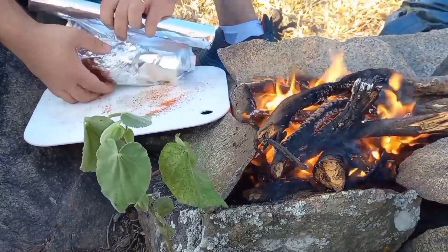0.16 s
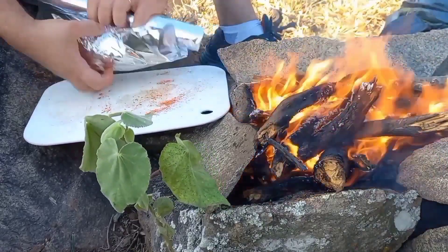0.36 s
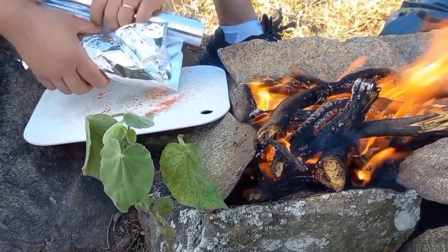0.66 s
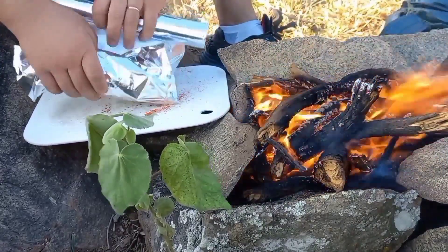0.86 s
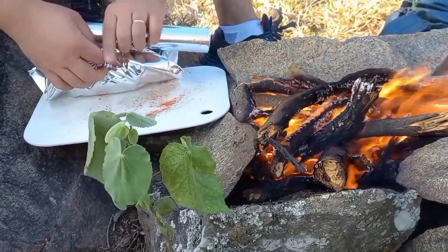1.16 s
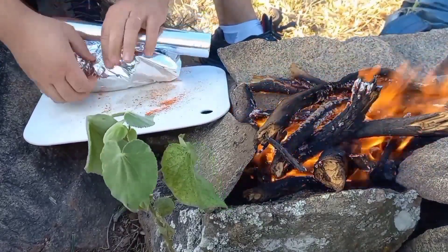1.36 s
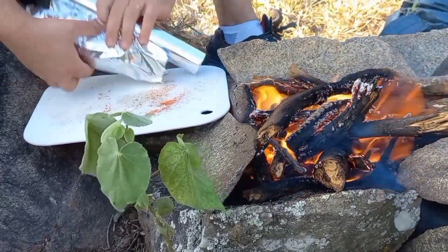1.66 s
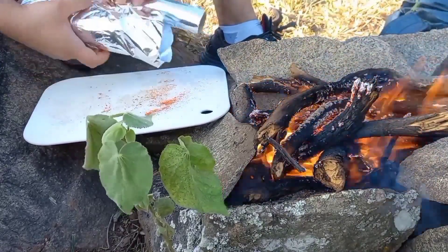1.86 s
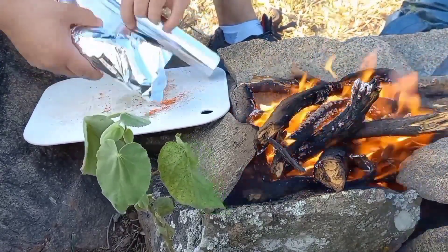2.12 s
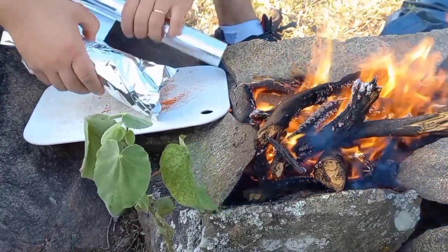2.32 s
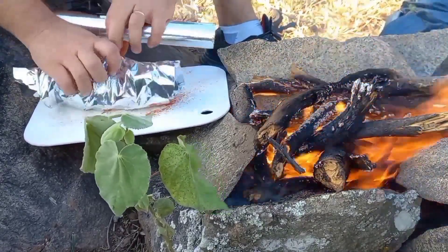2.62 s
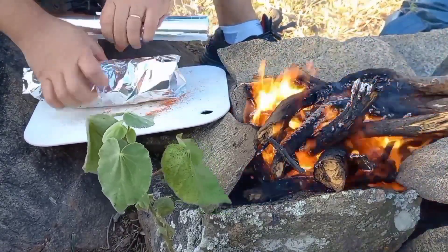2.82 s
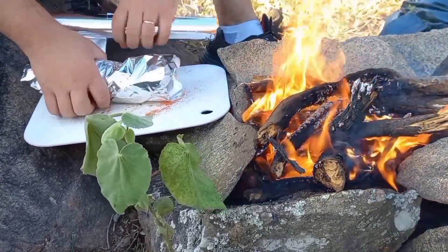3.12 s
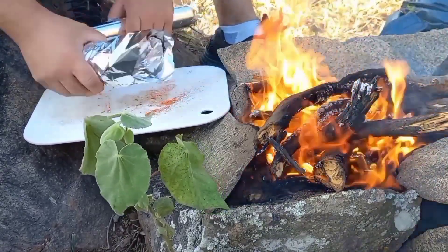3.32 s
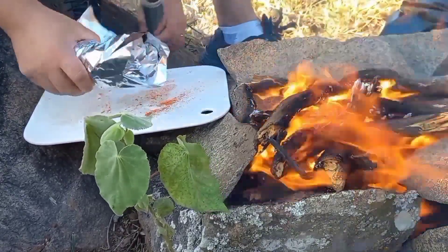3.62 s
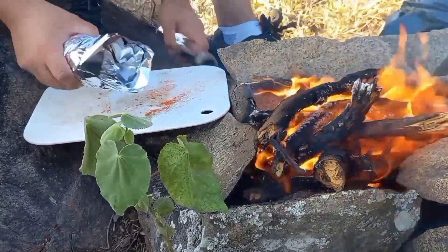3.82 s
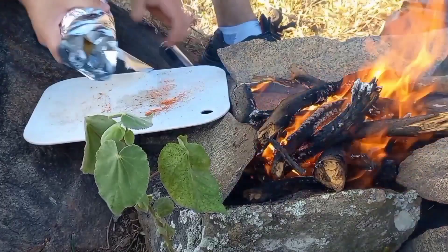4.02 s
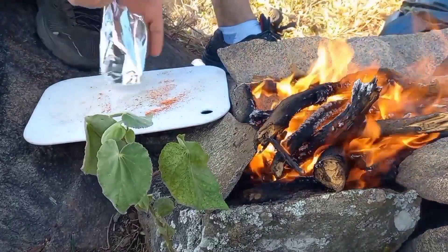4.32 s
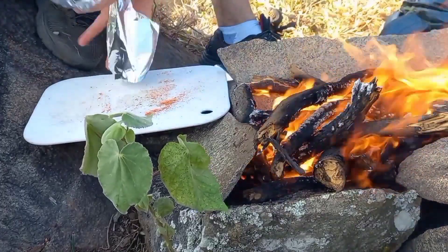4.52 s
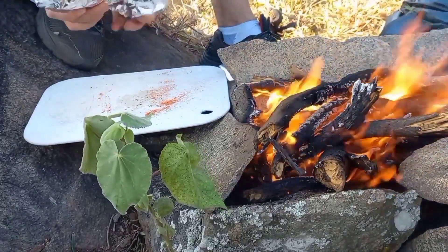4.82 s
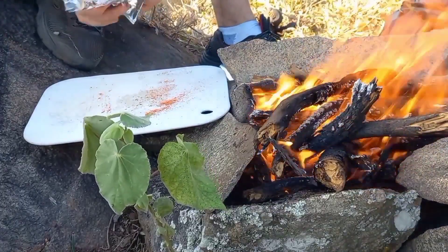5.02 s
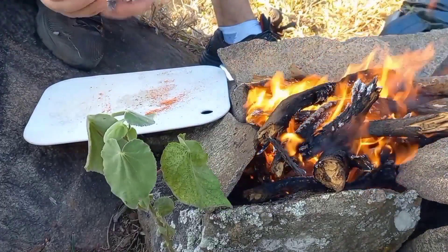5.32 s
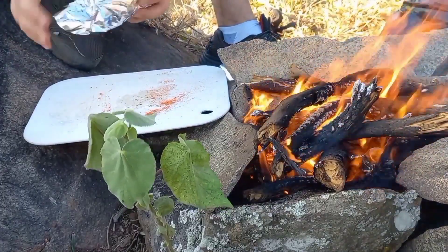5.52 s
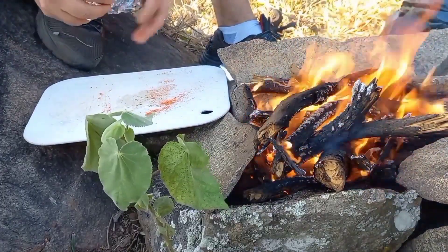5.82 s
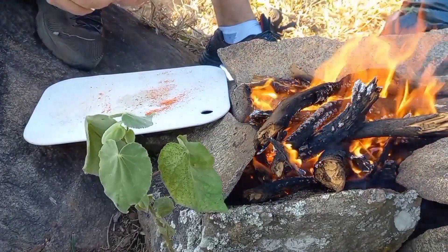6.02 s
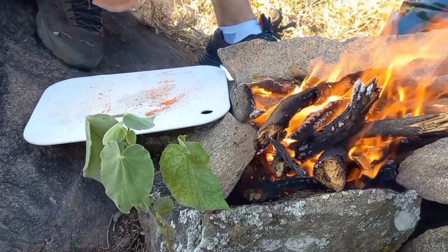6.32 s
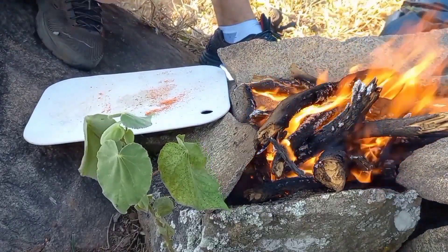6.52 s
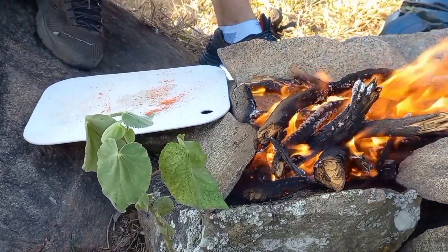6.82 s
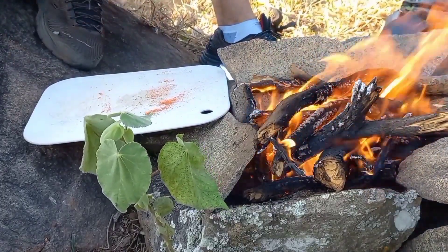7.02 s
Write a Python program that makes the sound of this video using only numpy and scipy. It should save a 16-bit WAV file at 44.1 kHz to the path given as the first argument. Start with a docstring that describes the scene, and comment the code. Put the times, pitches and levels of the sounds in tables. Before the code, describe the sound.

Hands crinkle and squeeze aluminium foil close by, crackling brightly with sharp fold snaps, while low wind buffets the microphone outdoors over a faint fire.

```python
"""Beside a camp fire: hands wrap aluminium foil round food, to the left of two close microphone ports.
Tiny creases crackle and fizz in clumps, wide panels flex lower down: random clicks set off pitched noise.
The fingers squeeze and pause; single folds snap as short noise bursts with a click and a knock.
Wind is low filtered noise that buffets either port, with pitched puffs as brief swelling sines.
Behind it lies the faint, steady filtered noise of the fire."""
import sys
import numpy as np
from scipy import signal
from scipy.fft import rfft, irfft
from scipy.io import wavfile
from scipy.ndimage import uniform_filter1d

SR = 44100
rng = np.random.default_rng(int(sys.argv[2]) if len(sys.argv) > 2 else 0)


def master_out(mix):
    """Clip the mix to full scale and print it as 16-bit PCM to the path in sys.argv[1]."""
    frames = np.transpose(np.atleast_2d(mix))
    ceiling = np.clip(frames, -1, 1)
    pcm = np.round(ceiling * 32767).astype(np.int16)
    wavfile.write(sys.argv[1], SR, pcm)


N = 315691

# spectrum of small creases: f/Hz, relative level/dB
CREASE_COLOUR = [(1500, -4), (2600, -11), (3800, 1), (5300, 5.5), (7400, 4), (8600, -33), (11000, 4)]
# spectrum of wide flexing panels: f/Hz, relative level/dB
PANEL_COLOUR = [(250, -24.5), (480, -2.5), (700, -9.5), (1000, -3), (1400, 2), (2100, 2), (3100, 3.5),
                (5000, 11)]
# spectrum of the finest creases, the fizz: f/Hz, relative level/dB
FINE_COLOUR = [(5000, -16), (7500, -2), (8700, -3), (11000, 0.5), (13500, 5), (16000, -1.5)]


def foil():
    """Creases crackle, the finest of them fizz and wide panels flex low, all under the same hands."""
    # the hands between squeezes: t/s, creasing level/dB, panel level/dB re creasing,
    # extra level of the deepest panels/dB
    hands = [(0.0, -39, -5, 2), (0.08, -37.5, -2, -1.5), (1.2, -39.5, 1, 1), (2.1, -41.5, 0, 5.5),
             (2.18, -43, -4.5, 5), (2.32, -44, -12, 5), (2.4, -38, -2, -4), (2.8, -43.5, 3.5, 0.5),
             (2.88, -47.5, -2.5, -11), (3.05, -41, -4.5, -6.5), (3.4, -41.5, -0.5, -13.5),
             (3.54, -38, -5.5, -12), (3.6, -50, -28, 17), (4.1, -46.5, -8, -5), (4.62, -47.5, -14, 0),
             (4.75, -40.5, -3, -4.5), (5.3, -37, -2.5, -3.5), (5.5, -43, -7.5, 0.5), (5.85, -43, -4.5, -4),
             (6.1, -50.5, -16.5, 1), (6.75, -50, -9, -9), (7.16, -49.5, -23, -3)]
    # squeezes of the fingers: start t/s, hold/s, creasing level/dB, panel level/dB and fizz level/dB re creasing
    squeezes = [(0.038, 0.12, -42, 2.5, -5), (0.103, 0.077, -39, 5.5, -9), (0.29, 0.064, -35, 1, 2.5),
                (0.508, 0.012, -29.5, 1.5, 6.5), (0.854, 0.14, -38.5, -0.5, 7),
                (0.856, 0.033, -35, -3.5, -6), (1.062, 0.06, -36, 3.5, 4.5), (1.272, 0.026, -40, 3, -2),
                (1.408, 0.016, -39, 1, 4), (1.476, 0.068, -40, -5, -1), (1.539, 0.16, -46, 9.5, 9),
                (1.753, 0.097, -37, -4, 3), (1.92, 0.022, -37, 2, 8), (1.991, 0.049, -39, 0.5, 3),
                (2.074, 0.032, -38, 6.5, 12), (2.12, 0.016, -36.5, 1.5, 8.5),
                (2.208, 0.025, -42.5, -8.5, 7), (2.348, 0.031, -39.5, -7, 9),
                (2.432, 0.16, -36.5, -22, 1.5), (2.5, 0.085, -40.5, 3.5, 5), (2.66, 0.11, -38.5, -25, 2),
                (2.778, 0.048, -40.5, 0, -3), (2.933, 0.024, -43.5, -18, -11),
                (3.06, 0.036, -38, -0.5, 1.5), (3.156, 0.04, -40, -1, -12), (3.224, 0.04, -39, -21, -1),
                (3.339, 0.084, -32.5, -2, -2), (3.428, 0.051, -37.5, -2, -8),
                (4.198, 0.051, -40.5, -2.5, 5.5), (4.378, 0.0074, -50, 1.5, 19),
                (4.412, 0.053, -46, -4.5, 10), (4.515, 0.015, -51.5, 4, 19), (4.657, 0.018, -39, -11, 11),
                (4.712, 0.013, -44.5, 0, 13), (4.952, 0.049, -40, -6, -10), (5.252, 0.047, -35.5, -3, 2),
                (5.614, 0.031, -33.5, -3, -0.5), (5.668, 0.063, -40.5, -17, 4),
                (5.748, 0.053, -40.5, -28, -2), (5.948, 0.09, -45.5, -7.5, 4), (6.152, 0.022, -44.5, -7, 3),
                (6.188, 0.0089, -39, -7, 5), (6.276, 0.024, -44, -7, 5), (6.326, 0.03, -42.5, -7, 0),
                (6.608, 0.019, -42.5, -15, 0), (6.803, 0.0042, -33.5, -1, 0),
                (6.963, 0.0066, -41.5, -17, 5.5)]
    touch_db, flex_db, deep_db = columns(hands)
    top_db, top_flex_db, top_fizz_db = np.transpose(squeezes)[2:]

    def squeezed(base_db, tops_db):
        return gain_of(topped(base_db, squeezes, tops_db, rise_db_per_s=1087, fall_db_per_s=595))

    # the fizz comes and goes on its own
    fizz_db = 4.5 + 2.5 * drift(12, channels=1)[0]
    crease_gain = squeezed(touch_db, top_db)
    panel_gain = squeezed(touch_db + flex_db, top_db + top_flex_db)
    fizz_gain = squeezed(touch_db + fizz_db, top_db + top_fizz_db)

    creases = buckles(2200, 9000, per_s=3200, spread_db=3.0, t60=0.045, clump_db=1.5, clump_hz=24, share=0.25)
    fizz = buckles(7500, 16000, per_s=3000, spread_db=2.8, t60=0.055, clump_db=4.6, clump_hz=22, share=0.25)
    panels = buckles(361, 3300, per_s=1500, spread_db=1.8, t60=0.055, clump_db=1.2, clump_hz=12.4, share=0.78)
    creases = steadied(coloured(creases, CREASE_COLOUR), 0.1)
    fizz = steadied(coloured(fizz, FINE_COLOUR), 0.07)
    panels = steadied(coloured(panels, PANEL_COLOUR), 0.082)

    # the deepest panels lie below about 1150 Hz
    deep = signal.sosfiltfilt(signal.butter(2, 1150, fs=SR, output="sos"), panels)
    panels = panels + (gain_of(deep_db) - 1) * deep

    # folds run into each other and shake the whole sheet
    crumple = gain_of(0.2 * drift(46.2, channels=1))
    rustle = crease_gain * creases + fizz_gain * fizz + panel_gain * panels
    return pauses() * crumple * rustle


def buckles(low_hz, high_hz, per_s, spread_db, t60, clump_db, clump_hz, share, count=20):
    """Random buckling clicks, mostly small and in clumps; each patch of the sheet rattles round its own pitch."""
    clicks = rng.random(N) < per_s / SR
    size = clicks * gain_of(spread_db * np.minimum(rng.exponential(1, N), 5))
    patch = rng.integers(0, count, N)
    shiver = rng.standard_normal((3, N))
    out = np.zeros((3, N))  # straight sound, then scattered sound left and right
    clumps = gain_of(clump_db * drift(clump_hz, channels=count // 4))  # neighbouring pitches clump together
    decay_power = burst(t60, np.ones(3000)) ** 2
    for k, hz in enumerate(np.geomspace(low_hz, high_hz, count)):
        click_power = (size * clumps[k // 4] * (patch == k)) ** 2
        power = signal.oaconvolve(click_power, decay_power)[:N]
        rattle = np.sqrt(abs(power) / hz) * np.roll(shiver, rng.integers(N), 1)
        out += signal.lfilter(*signal.iirpeak(hz, 5, SR), rattle)
    return at_ports(out[0], out[1:], share)


def pauses():
    """The hands stop for a moment: the rustle sinks, stays low and springs back."""
    # pauses of the hands: start t/s, hold/s, level change/dB
    stops = [(3.595, 0.0064, -12), (3.717, 0.068, -9.5), (3.984, 0.0055, -5), (5.571, 0.012, -16.5),
             (5.897, 0.023, -21), (6.211, 0.023, -11), (6.659, 0.055, -12), (7.073, 0.043, -8.5)]
    sink_s, spring_s = 0.046, 0.019
    t = np.arange(N) / SR
    total_db = np.zeros(N)
    for s, hold, db in stops:
        total_db += np.interp(t, [s - sink_s, s, s + hold, s + hold + spring_s], [0, db, db, 0])
    return gain_of(total_db)


def snaps():
    """Each fold cracks and rattles out; the parcel under it takes a short uneven knock."""
    # single folds snapping: t/s, drive level/dB, then panel body, thud and fizz level/dB re drive;
    # body and thud are trimmed below
    folds = [(0.405, -20, 31, -32, -2), (0.5121, -31, 8, 3.5, -7), (0.86, -18.5, 11, -12, 11),
             (1.0668, -21, 35, -11, 13), (1.4119, -27, 22, -15, 1), (1.917, -18.5, 34.5, -19, 6),
             (2.0747, -18.5, 15, -31, 10), (2.102, -29, 12, -6, 0), (2.1273, -14.5, 21, -18, 2),
             (2.9272, -22.5, -7, -17.5, -6), (3.3725, -16.5, 25, -40, 0), (3.603, -34, -5, -31, 9),
             (3.6682, -24.5, 21, -16.5, -9), (3.699, -25, -14, -33, -14), (3.816, -29, 8, -25, 14),
             (4.002, -23, 18, -12, -8), (4.161, -30.5, -5, -40, 16), (4.2067, -21, -18, -32, 17),
             (4.3752, -27, 20, -25, 13), (4.4164, -23.5, -14, -43, 17), (4.4553, -22, -10, -43, -6),
             (4.5142, -25, 10, -18, 17), (4.6113, -28, -7, -30, 15), (4.6584, -21, -8, -19, 4),
             (4.718, -20, 19, -28, -4), (5.516, -17.5, -6, -28, -2), (5.602, -17, 10, -23, -3),
             (5.935, -29.5, -12, -14.5, 15.5), (6.19, -24.5, -13, -31, 13.5), (6.666, -31, -15, -32, 6),
             (6.7992, -23, 7, -9, 7), (7.142, -36.5, -10, -25, 22)]
    # spectrum of the knock on the parcel: f/Hz, relative level/dB
    thud_colour = [(120, -29), (250, 2.5), (450, -7.5), (850, -10), (1200, -32), (1700, -45), (2600, -37)]
    t60, length = 0.015, 4000
    crease, panel, fine, thud = layers = np.zeros((4, 3, N + length))
    for s, db, body_db, thud_db, fizz_db in folds:
        draws = rng.standard_normal((3, length))
        at = round(s * SR)
        span = slice(at, at + length)
        rattle = burst(t60, draws, rise_s=0.0007)
        crease[:, span] += gain_of(db - 6.5) * rattle
        panel[:, span] += gain_of(db + body_db - 29.5) * rattle
        fine[:, span] += gain_of(db + fizz_db) * burst(t60, draws, rise_s=0.008)
        # the first click of the fold
        crease[:, at + 20] += gain_of(db + 2)
        fine[:, at + 20] += gain_of(db + 2)
        # five knocks of random sign, 40 samples apart
        thud[:, at + 40:at + 240:40] += gain_of(db + thud_db + 13) * np.sign(draws[:, :5])
    colours = (CREASE_COLOUR, PANEL_COLOUR, FINE_COLOUR, thud_colour)
    fold = sum(coloured(x, colour) for x, colour in zip(layers, colours))
    return at_ports(fold[0], fold[1:], share=0.97)


def burst(t60, draws, rise_s=0.0037):
    """Rattle of a buckled patch: noise swells with time constant rise_s and dies by 60 dB in t60 seconds."""
    t = np.arange(draws.shape[-1]) / SR
    return draws * (1 - np.exp(-t / rise_s)) * gain_of(-60 * t / t60)


def at_ports(near, scattered, share):
    """Straight sound lags at the right port below 8.3 kHz; scattered sound differs; share is straight power."""
    lag_s = 0.00012
    hz = np.fft.rfftfreq(N, 1 / SR)
    # the lag grows to one full turn near 8.3 kHz; above that both ports are set in phase
    turns = np.minimum(hz * lag_s, 1)
    right = irfft(rfft(near) * np.exp(-2j * np.pi * turns), N)
    return np.sqrt(share) * np.array([near, right]) + np.sqrt(1 - share) * scattered


def wind():
    """A rumble with a faster flutter on top; the breeze and each buffet lean to one port or the other."""
    # the air between buffets: t/s, rumble level/dB, flutter level/dB, left minus right/dB
    breeze = [(0.0, -33.5, -46.5, -2), (0.2, -40, -51, -9), (0.45, -26.5, -37, 2.5), (0.62, -37, -43, -16),
              (0.75, -34.5, -45.5, 1.5), (1.15, -35, -45, -5), (1.4, -41, -36.5, -23),
              (1.57, -23.5, -56, 5), (1.72, -32.5, -38.5, -37), (1.95, -36, -38, 18), (2.3, -36, -50, -4),
              (2.75, -38, -40.5, 0), (3.05, -42.5, -52, -8), (3.3, -44, -73, -28), (3.72, -39, -60, 4),
              (3.9, -44.5, -67, -56), (4.2, -42, -66, 27), (4.6, -33, -48.5, -22), (5.0, -38, -54, -7),
              (5.5, -34, -44.5, -3), (5.58, -43, -63, -19), (5.72, -26, -37, -2), (5.9, -43.5, -60, -15),
              (6.1, -45.5, -69, 12), (6.4, -40, -49, -36), (6.72, -49.5, -64, -10), (6.8, -27, -32.5, -40),
              (7.16, -24.5, -41, 12)]
    # buffets of a gust: start t/s, hold/s, rumble level/dB, flutter level/dB re rumble, left minus right/dB
    buffets = [(0.315, 0.012, -25.5, -12, -18), (0.394, 0.014, -22.5, -18, -17),
               (0.514, 0.07, -22, -9.5, -14), (0.94, 0.022, -32, -19, -9), (1.088, 0.13, -30, -1, -0.5),
               (1.16, 0.045, -34, -5, -2), (1.248, 0.018, -20.5, -15, -14), (1.346, 0.069, -29.5, -21, -22),
               (1.527, 0.094, -24.5, -9, -2), (1.775, 0.061, -31, -24, -25), (1.885, 0.043, -22.5, -5, -5),
               (2.021, 0.029, -21, -32, 19), (2.104, 0.033, -30, -23, 24), (2.178, 0.048, -31, -10, -12),
               (2.37, 0.055, -34.5, -28, -4), (2.578, 0.047, -28.5, -7, 0),
               (2.759, 0.024, -24.5, -14.5, -6), (2.852, 0.009, -21, -32, -9), (3.027, 0.022, -29, -21, 5),
               (3.736, 0.035, -34, -22, -4), (3.997, 0.0095, -27, -13, -29),
               (4.078, 0.16, -30.5, -18.5, -8), (4.273, 0.012, -24, -22.5, 6),
               (4.413, 0.009, -26.5, -30, 2), (4.666, 0.04, -23.5, -26, -1), (4.741, 0.0099, -27, -10.5, 2),
               (4.983, 0.12, -29.5, -20, -1), (5.234, 0.011, -28, -30, 0), (5.28, 0.086, -36, -30, -9),
               (5.508, 0.02, -30, -16, 1), (5.617, 0.023, -25.5, -14.5, -7),
               (5.67, 0.046, -24.5, -8.5, 0.5), (5.786, 0.057, -26, -18, 2),
               (6.365, 0.025, -35.5, -29, -43), (6.759, 0.02, -29.5, -16, 7), (6.838, 0.05, -24, -0.5, -7),
               (7.08, 0.012, -27, -12, -21)]
    # spectra of rumble and flutter: f/Hz, relative level/dB
    rumble_colour = [(15, -21), (30, -19), (55, -4), (75, -0.5), (110, -6), (150, -19), (250, -43)]
    flutter_colour = [(90, -14), (140, 2.5), (220, 4.5), (330, -4), (480, -20), (650, -28), (1000, -46)]
    rumble_db, flutter_db, lean_db = columns(breeze)
    top_db, top_flutter_db, top_lean_db = np.transpose(buffets)[2:]

    def port_gains(base_db, tops_db):
        ports = zip(leaning(lean_db), leaning(top_lean_db))
        return gain_of([topped(base_db + port, buffets, tops_db + top_port, rise_db_per_s=900, fall_db_per_s=696)
                        for port, top_port in ports])

    roll = eddies(rumble_colour, steady_s=0.032, lump_db=2.07, lump_hz=21.2, share=0.21)
    flutter = eddies(flutter_colour, steady_s=0.03, lump_db=4.9, lump_hz=23.5, share=0.51)
    # pressure crests of the rumble are sharper than its troughs
    crests = roll ** 2 - uniform_filter1d(roll ** 2, 1200)
    rumble = evened(roll + 0.17 * crests)
    return port_gains(rumble_db, top_db) * rumble + port_gains(flutter_db, top_db + top_flutter_db) * flutter


def eddies(points, steady_s, lump_db, lump_hz, share):
    """Turbulent pressure, a share of its power common to both ports: evened over steady_s, then made lumpy."""
    both, left, right = rng.standard_normal((3, N))
    air = np.sqrt(share) * both + np.sqrt(1 - share) * np.array([left, right])
    lumps = gain_of(lump_db * drift(lump_hz, channels=2))
    return evened(steadied(coloured(air, points), steady_s) * lumps)


def puffs():
    """Single eddies knock on the ports: a few cycles swell and fade, with their own phase at each port."""
    # eddies with a pitch of their own: centre t/s, f/Hz, level/dB
    knocks = [(0.453, 97, -13), (0.518, 470, -27), (1.157, 74, -6), (2.05, 98, -14.5), (5.7, 200, -19),
              (5.741, 95, -11), (6.815, 89.5, -8), (6.875, 141, -20), (6.904, 125, -16.5),
              (7.014, 179, -16), (7.041, 104, -14), (1.075, 460, -21.5), (1.14, 300, -21),
              (1.244, 470, -29), (1.287, 485, -33), (6.784, 203, -23.5), (6.839, 275, -22.5),
              (6.855, 437, -35), (6.913, 402, -22.5)]
    t = np.arange(N) / SR
    out = np.zeros((2, N))
    for s, hz, db in knocks:
        cycles = 3.27 * np.sqrt(hz / 400)  # deeper eddies ring fewer
        swell = np.exp(-(2 * hz * (t - s) / cycles) ** 2)
        turn = rng.uniform(0, 0.57, (2, 1))
        out += gain_of(db) * swell * np.sin(2 * np.pi * (hz * (t - s) + turn))
    return out


def flames():
    """Faint steady roar and hiss of the fire: filtered noise, half its power common to both ports."""
    # spectrum of the fire: f/Hz, relative level/dB
    fire_colour = [(60, -15), (250, 31), (500, 22), (900, 17), (2000, -16), (4000, -102), (9000, -25),
                   (16000, 19.5)]
    roar = rng.standard_normal((2, N)) + rng.standard_normal(N)
    return gain_of(-58) * evened(coloured(roar, fire_colour))


def gain_of(db):
    """Decibels to an amplitude factor."""
    return 10 ** (np.asarray(db) / 20)


def evened(x):
    """Scales to rms 1."""
    return x / np.sqrt(np.mean(x ** 2) + 1e-20)


def steadied(x, steady_s):
    """Holds the strength even over steady_s seconds; quicker changes stay."""
    size = round(steady_s * SR)
    power = uniform_filter1d(uniform_filter1d(x ** 2, size), size)
    return x / np.sqrt(abs(power) + 1e-9)


def columns(rows):
    """Every column of a curve table after its times, one value a sample."""
    s, *rest = np.transpose(rows)
    return [np.interp(np.arange(N) / SR, s, c) for c in rest]


def coloured(x, points):
    """Causal minimum-phase filter of energy 1 with the given spectrum, so that clicks keep a sharp start."""
    f, db = np.transpose(points)
    hz = abs(np.fft.fftfreq(8192, 1 / SR))
    curve_db = np.interp(np.log(hz + 1), np.log(f), db, left=-80, right=db[-1] - 15)
    log_gain = np.log(gain_of(curve_db))
    taps = np.fft.ifft(np.exp(np.conj(signal.hilbert(log_gain)))).real[:4096]
    taps /= np.linalg.norm(taps)
    return signal.oaconvolve(x, taps[None], axes=1)[:, :N]


def drift(hz, channels):
    """Random wandering of rms 1: noise low-passed at hz."""
    b, a = signal.butter(2, hz, fs=SR)
    return evened(signal.lfilter(b, a, rng.standard_normal((channels, N))))


def topped(base_db, rows, tops_db, rise_db_per_s, fall_db_per_s):
    """A level in dB with events added in power: each rises, holds at its top and falls away."""
    t = np.arange(0, N / SR, 0.002)
    start, hold = np.transpose(rows)[:2, :, None]
    before_db = np.maximum(rise_db_per_s * (start - t), 0)
    after_db = np.maximum(fall_db_per_s * (t - start - hold), 0)
    power = (gain_of(tops_db[:, None] - before_db - after_db) ** 2).sum(0)
    return 10 * np.log10(gain_of(base_db) ** 2 + np.interp(np.arange(N) / SR, t, power))


def leaning(lean_db):
    """Left and right dB of a sound that leans to one port at constant power."""
    ports = gain_of([lean_db / 2, -lean_db / 2])
    return 10 * np.log10(ports ** 2 / (ports ** 2).mean(0))


def scene():
    """All sources at the two ports."""
    return foil() + snaps() + wind() + puffs() + flames()


def record(dry):
    """The band limit of the recorder: a steep low-pass at 16.1 kHz."""
    taps = signal.firwin(511, 16100, window=("kaiser", 9), fs=SR)
    return signal.oaconvolve(dry, taps[None], "same")


dry = scene()
out = record(dry)
master_out(out)
```